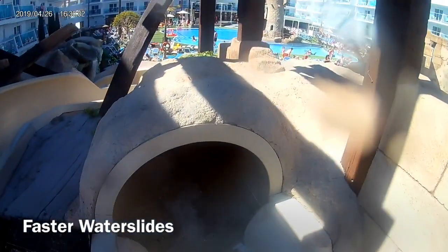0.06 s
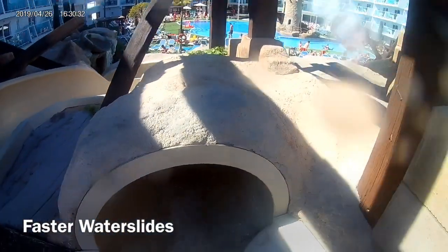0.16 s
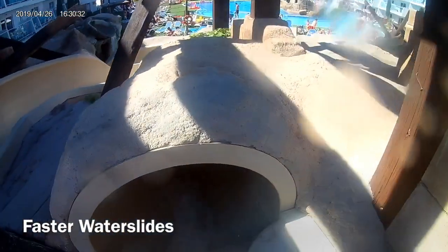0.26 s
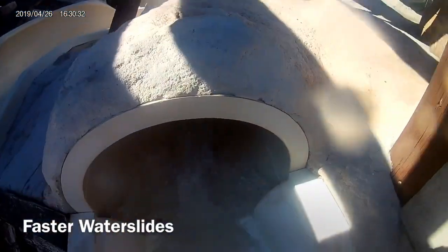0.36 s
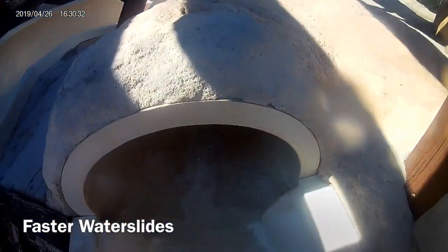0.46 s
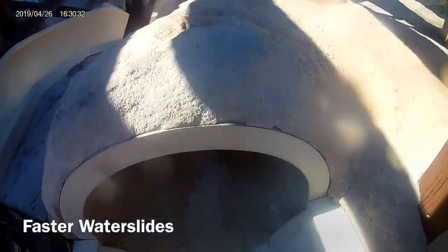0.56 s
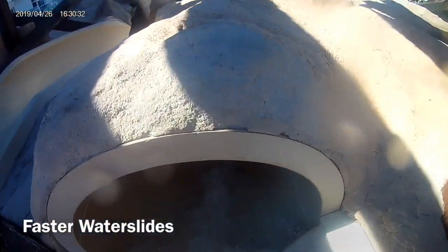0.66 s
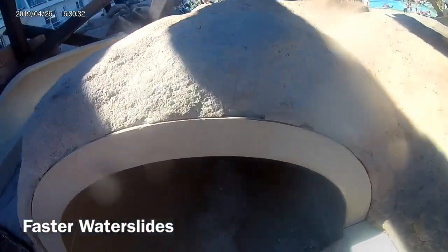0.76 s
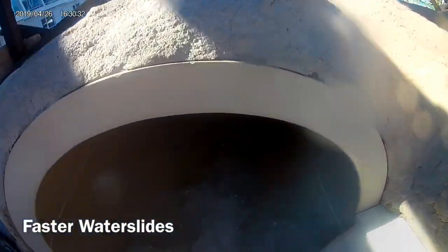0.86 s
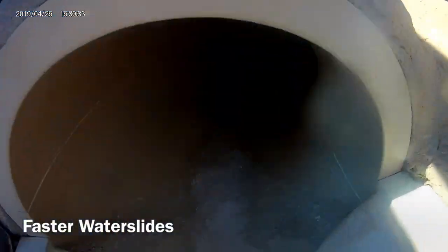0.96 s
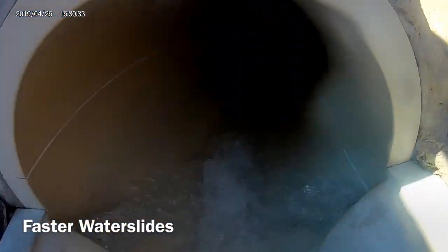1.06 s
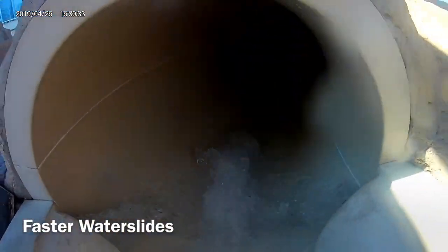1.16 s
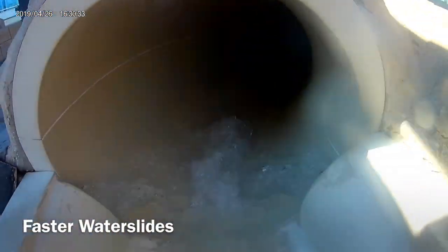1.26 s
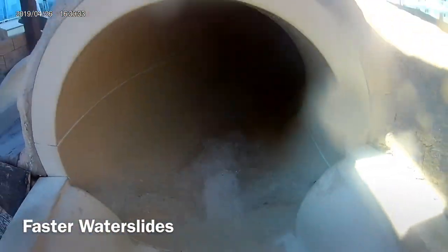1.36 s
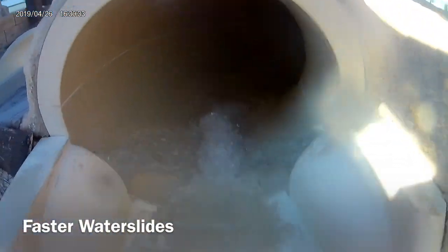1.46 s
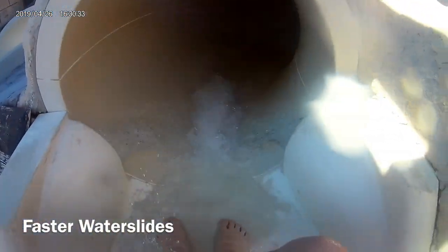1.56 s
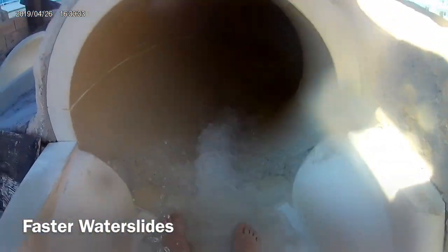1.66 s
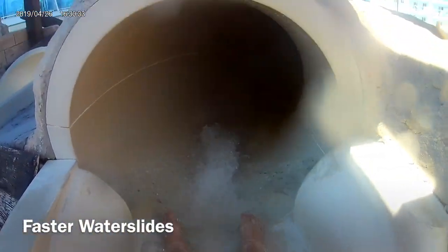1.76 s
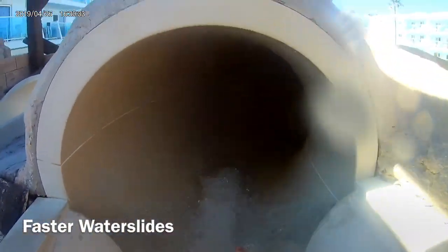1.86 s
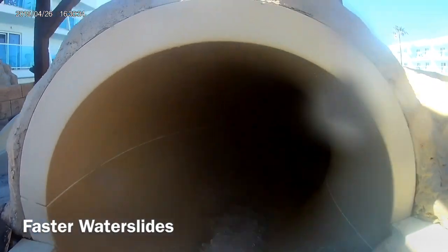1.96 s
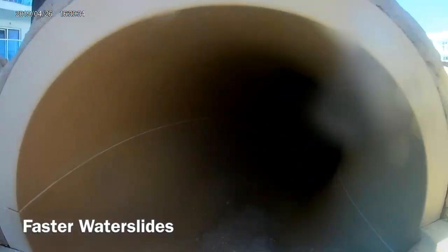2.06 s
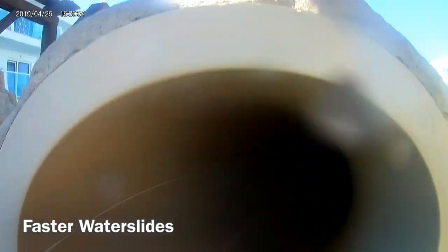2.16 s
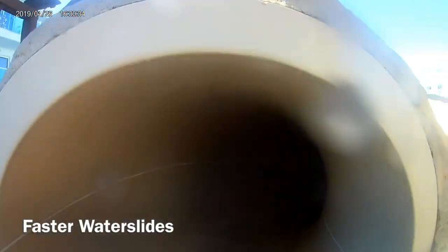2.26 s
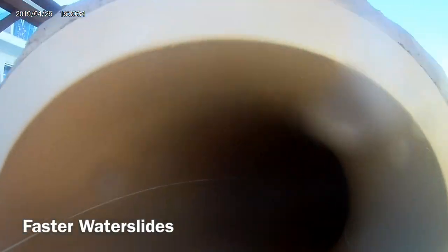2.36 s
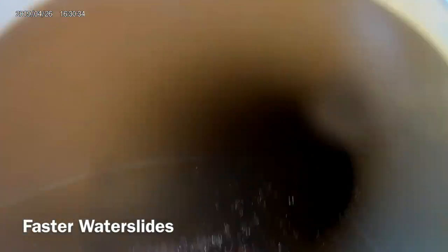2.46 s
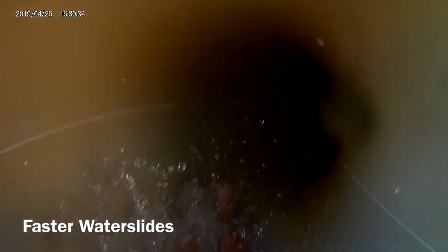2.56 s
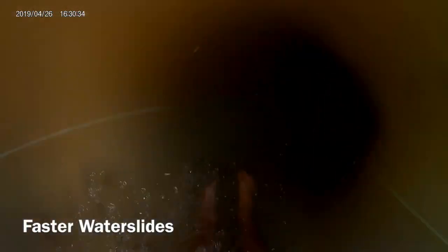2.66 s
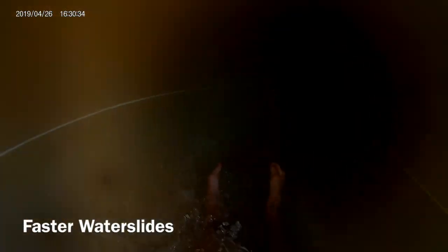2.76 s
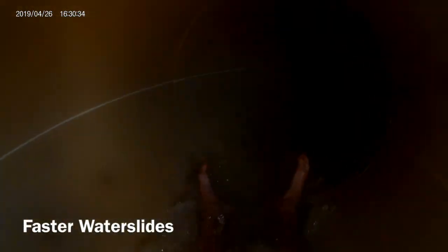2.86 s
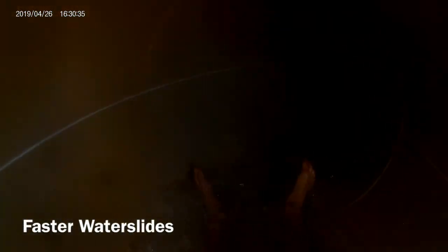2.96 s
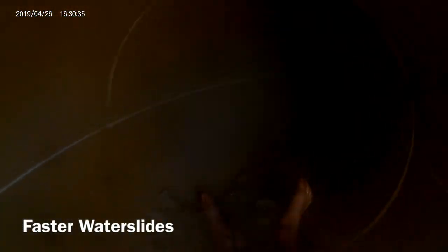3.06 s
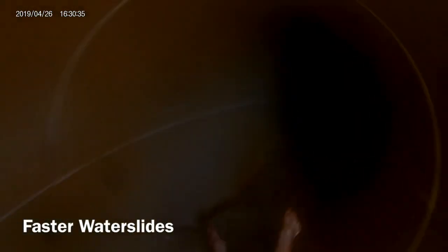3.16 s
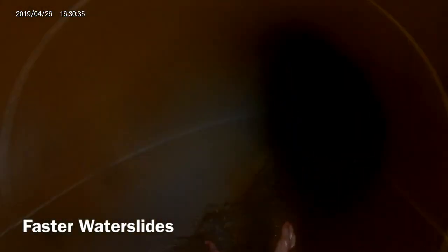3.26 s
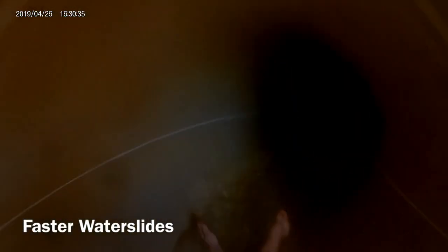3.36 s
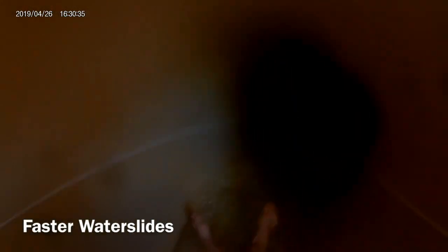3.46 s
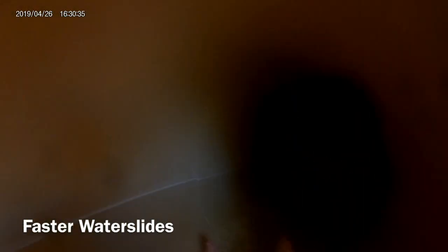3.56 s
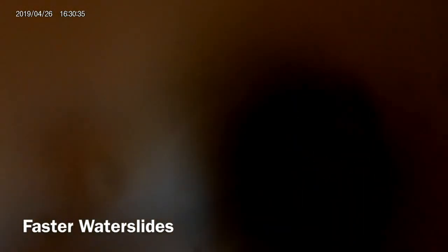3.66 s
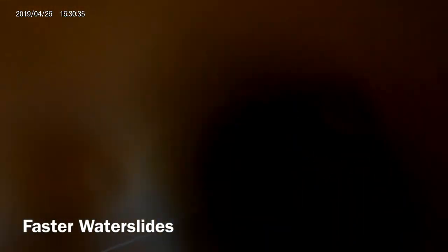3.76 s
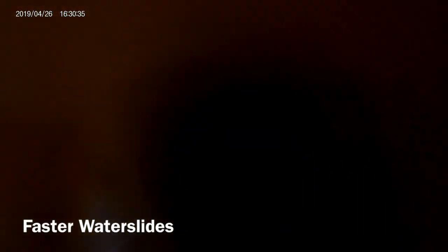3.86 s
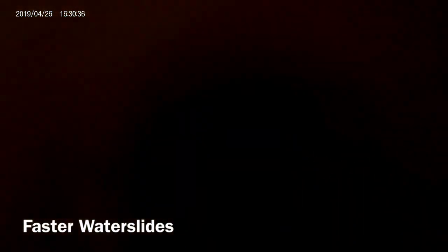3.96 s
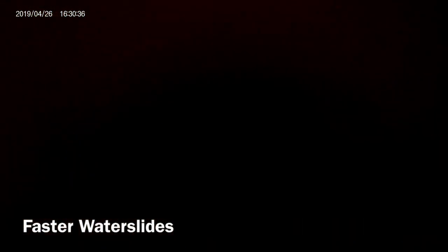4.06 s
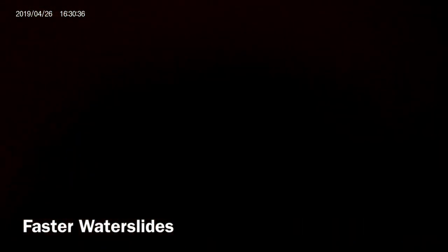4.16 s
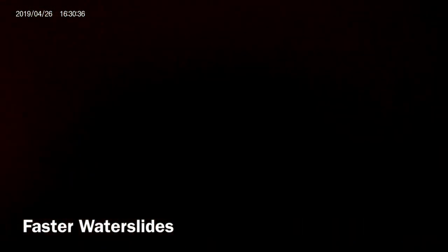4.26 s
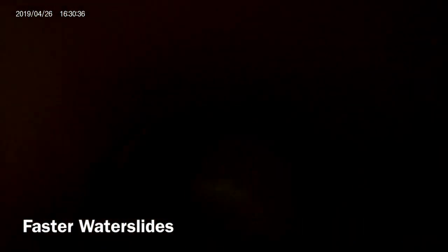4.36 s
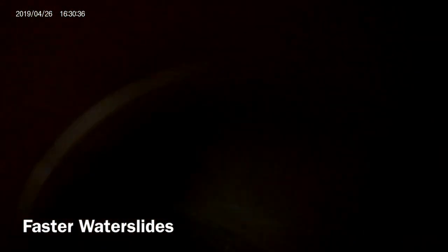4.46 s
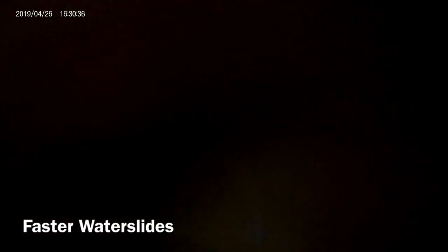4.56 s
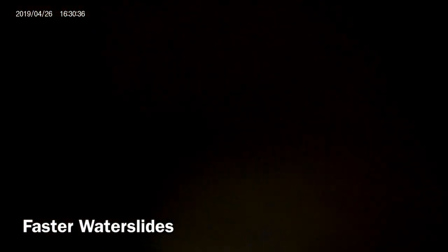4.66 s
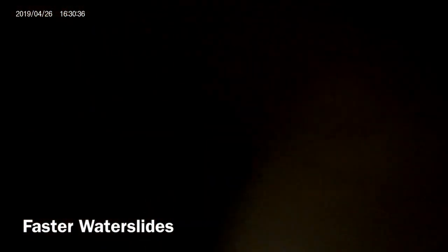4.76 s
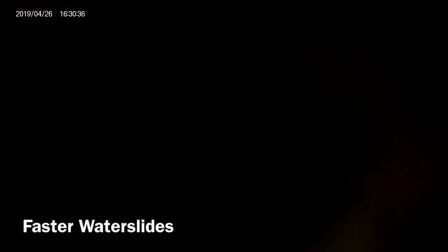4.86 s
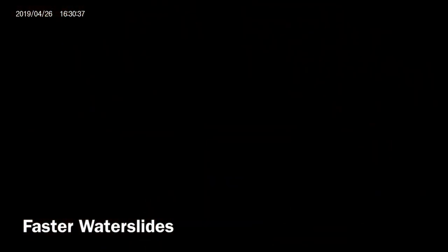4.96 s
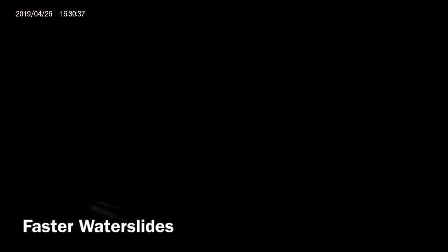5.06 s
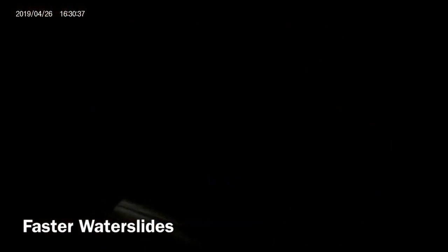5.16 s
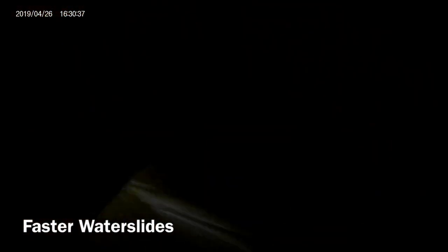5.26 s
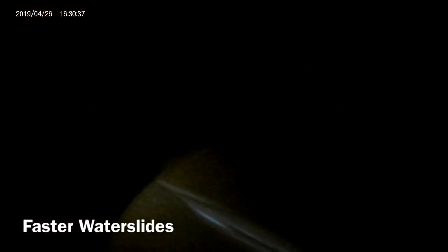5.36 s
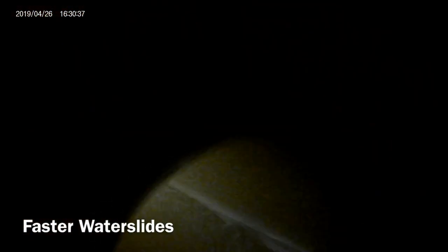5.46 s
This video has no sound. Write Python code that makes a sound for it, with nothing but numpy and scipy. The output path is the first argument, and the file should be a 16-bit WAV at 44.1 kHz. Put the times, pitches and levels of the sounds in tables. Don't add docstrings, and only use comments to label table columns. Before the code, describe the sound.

Close, muffled sound from a microphone shut inside a plastic housing: churning water with a nasal ring, a hollow tube boom and thin, watery treble. Low sways and drips come first, then sharp double knocks as the rider drops in. Inside the dark tube the rush is fuller, with ticks, thuds, short hollow gulps and a second hard clatter, then mostly steady water.

```python
import sys
import numpy as np
from scipy import signal
from scipy.fft import rfft, irfft, next_fast_len
from scipy.io import wavfile
from scipy.ndimage import uniform_filter1d, minimum_filter1d

SR = 44100
rng = np.random.default_rng(int(sys.argv[2]) if len(sys.argv) > 2 else 0)


def int16_out(signal):
    q = np.round(np.clip(np.atleast_2d(signal).T, -1, 1) * 32767)
    wavfile.write(sys.argv[1], SR, q.astype(np.int16))


def elevation(decibels):
    levels = np.asarray(decibels, float)
    return 10 ** (levels / 20)


N = 242991
T = np.arange(N) / SR

# pitch in Hz, width in Hz, level in dB.
CASE_RINGS = [(1360, 118.5, 7), (1262, 146, -4), (1596, 188, -4)]
# pitch in Hz, width in Hz.
UPPER_RING = (2090, 230)
# time in seconds, level in dB.
WATER_FLOW = [(0, -42.5), (.08, -40), (.9, -39), (1.3, -35), (1.7, -35.5), (2.05, -37), (2.6, -35.5),
              (2.75, -28), (2.95, -31.5), (3.2, -34), (3.55, -31.5), (3.75, -34.5), (3.85, -32),
              (4.5, -32.5), (4.8, -33.5), (5.15, -34.5), (5.51, -35.5)]
# time in seconds, level in dB.
RIDER_ROCKING = [(0, -54.5), (.2, -52), (.8, -53), (1.0, -49), (1.3, -49), (1.47, -44.5), (1.62, -51),
                 (2.05, -50.5), (2.27, -40), (2.47, -44.5), (2.7, -32.5), (2.9, -51.5), (3.25, -40.5),
                 (3.4, -46.5), (3.7, -36), (3.95, -42.5), (4.4, -35.5), (5.0, -43)]


def evened(x):
    return x / np.sqrt(np.mean(x ** 2) + 1e-20)


def add(mix, s, sound):
    part = mix[round(s * SR):][:len(sound)]
    part += sound[:len(part)]


def column(rows, index):
    table = np.array(rows)
    return np.interp(T, table[:, 0], table[:, index])


def coloured(x, points):
    hz, db = np.transpose(points)
    size = next_fast_len(N)
    log_hz = np.log(np.fft.rfftfreq(size, 1 / SR) + 1)
    shape_db = np.interp(log_hz, np.log(hz + 1), db)
    return evened(irfft(rfft(x, size) * elevation(shape_db), size)[:N])


def ring(x, hz, width):
    r = np.exp(-np.pi * width / SR)
    return 2 * signal.lfilter([1 - r], [1, -r * np.exp(2j * np.pi * hz / SR)], x).real


def layer_db(level_db, flow, rocking, soaked_db, fast_db):
    soak_s = 2.26
    soaked = np.clip((T - soak_s) / 0.3, 0, 1)
    fast = np.clip((T - soak_s) / 2.76, 0, 1)
    more_flow_db = column(WATER_FLOW, index=1) + 35
    more_rocking_db = column(RIDER_ROCKING, index=1) + 44
    from_ride_db = flow * more_flow_db + rocking * more_rocking_db
    return level_db + from_ride_db + soaked_db * soaked + fast_db * fast


def hiss(dull):
    # frequency in Hz, level in dB per Hz.
    hiss_colour = [(5000, -36), (6400, 1), (7000, 5), (7500, -1), (7950, -7.5), (8600, -0.5), (9600, -4.5),
                   (10600, -1), (11400, -6), (15700, -7), (16500, -62.5)]
    sharp = dull - uniform_filter1d(dull, size=700)
    peak_db = 5 * np.log10(abs(uniform_filter1d(sharp ** 4, size=1100)) + 1e-14)
    slow_db = uniform_filter1d(peak_db, size=13000)
    jumps = np.sqrt(0.76 + 0.28 * elevation(2.2 * (peak_db - slow_db)))
    return elevation(0.78 * slow_db - 50.5) * jumps * coloured(rng.standard_normal(N), hiss_colour)


def sway():
    # frequency in Hz, level in dB per Hz.
    sway_colour = [(7.1, -30), (12, 14), (30, 4.5), (42, 0), (64, -14), (123, -22), (172, -28.5),
                   (220, -40), (290, -62.5), (480, -120)]
    sway_db = column(RIDER_ROCKING, index=1) + 5.5
    return elevation(sway_db) * coloured(rng.standard_normal(N), sway_colour)


def gulps():
    # time in seconds, level in dB, pitch in Hz, width in Hz, length in seconds.
    gulp_rows = [
        (3.56, -42.5, 412, 140, 0.091),
        (3.627, -36, 374, 120, .09),
        (3.812, -39.5, 492, 162, 0.06),
        (4.162, -33, 564, 201, 0.11),
        (4.201, -41, 706, 242, 0.05),
        (4.39, -35.5, 530, 240, 0.032),
    ]
    noise = rng.standard_normal(N)
    out = np.zeros(N)
    for s, db, hz, width, length in gulp_rows:
        hollow = evened(ring(ring(noise, hz, width), hz, width))
        swell = np.exp(-((T - s) / (0.5 * length)) ** 2)
        out += elevation(db) * hollow * swell
    return out


def drops():
    # time in seconds, peak in dB, pitch in Hz.
    drop_rows = [(0.5922, -29, 1290), (0.722, -28, 1360), (1.476, -38, 1360), (1.6052, -22.5, 1420),
                 (1.6916, -23, 1360), (1.795, -25, 1340), (2.212, -24.5, 1390), (2.3363, -22, 1460),
                 (2.4533, -25.5, 1436), (3.035, -20, 1310), (4.5, -19, 1240)]
    t = T[:1200]
    u = t / 0.002
    swell = u * np.exp(1 - u)
    out = np.zeros(N)
    for s, db, hz in drop_rows:
        tone = np.sin(2 * np.pi * (hz * t + rng.random()))
        add(out, s, elevation(db) * swell * tone)
    return out


def ticks():
    # time in seconds, peak in dB.
    tick_rows = [
        (1.5854, -33),
        (2.1724, -21),
        (2.3345, -41),
        (2.5597, -24),
        (2.7421, -44),
        (3.231, -38),
        (3.6202, -52),
        (3.6752, -28),
        (3.7514, -44),
        (4.284, -37),
    ]
    # pitch in Hz, level in dB, time to fall by 60 dB in seconds.
    shell_notes = [(900, 0, .005), (1350, 5, .007), (2000, 5, .006), (3300, 1, .006), (4200, -2, .008),
                   (5000, -5, .005), (5700, -9, .006)]
    t = T[:1500]
    shell = np.zeros(len(t))
    for k, (hz, db, t60) in enumerate(shell_notes):
        shell += (-1) ** k * elevation(db - 60 * t / t60) * np.sin(2 * np.pi * hz * t)
    shell = signal.sosfilt(signal.butter(12, 6150, fs=SR, output="sos"), shell)
    grit_fade = np.exp(-T[:400] / 0.0018)
    out = np.zeros(N)
    for s, db in tick_rows:
        contact = 0.12 * rng.standard_normal(400)
        contact[0] = 1
        tick = np.convolve(contact * grit_fade, shell)
        add(out, s, elevation(db + 8.5) * tick / abs(tick).max())
    return out


def bumps():
    # time in seconds, direction, peak in dB, width in ms.
    bump_rows = [(0.235, 0.87, -32.5, 12), (1.095, 1, -35.5, 4.2), (1.4116, -0.45, -25.5, 2.8),
                 (2.19, 0.84, -21.5, 2.7), (2.2654, 0.88, -19, 5.3), (2.368, 1, -22, 12),
                 (2.5613, 0.94, -23, 0.87), (2.748, 0.9, -24, 8.2), (3.241, 0.75, -26, 9.2),
                 (3.285, 0.89, -31, 5.3), (3.6537, 1, -29, 3.1), (3.7133, -0.24, -16.5, 4.5),
                 (3.78, 1, -26.5, 6.4), (4.1624, 0.74, -19, 5.1), (4.31, 0.43, -21, 17),
                 (4.8325, 1, -34, 1.3), (4.9905, 0.98, -27, 3.7), (5.4, 0.9, -27, 8.8)]
    out = np.zeros(N)
    for s, direction, db, ms in bump_rows:
        u = np.arange(-3 * ms * SR // 1000, 30 * ms * SR // 1000) / (ms * SR / 1000)
        push = np.exp(-u ** 2)
        late = np.maximum(u, 0) / 0.92
        back = late * np.exp(-late) * np.cos(0.25 * late)
        balanced = push - back * push.sum() / back.sum()
        add(out, s - 3 * ms / 1000, direction * elevation(db) * balanced)
    return out


def rattle():
    # time in seconds, direction, peak in dB, width in ms, gap to the first bounce in ms (0 = none).
    strikes = [
        (2.343, 1, -8, .2, 0),
        (2.3772, -1, -8.5, .27, 5.8),
        (2.6087, -1, -8.5, .3, 6.9),
        (4.2836, 1, -8, .2, 0),
        (4.3163, -1, -5.5, .2, 6.2),
    ]
    before = 200
    t_ms = (np.arange(1200) - before) * 1000 / SR
    late = np.maximum(t_ms, 0) / 1.8
    spring_back = late * np.exp(1 - late)
    out = np.zeros(N)
    for s, direction, db, ms, gap_ms in strikes:
        near_corner = 1 / np.cosh(t_ms / ms) ** 2
        far_corner = 0.4 / np.cosh((t_ms - 0.55) / ms) ** 2
        blow = direction * (near_corner + far_corner - (0.4 + 0.07 * direction) * spring_back)
        while db > -18:
            add(out, s - before / SR, elevation(db - 2.3) * blow)
            if gap_ms == 0:
                break
            s += gap_ms / 1000
            db -= 3.6
            gap_ms *= 0.56
    main = elevation(-5) * ring(out, CASE_RINGS[0][0], 350)
    upper = elevation(-4) * ring(out, UPPER_RING[0], 500)
    bright = elevation(8) * ring(ring(out, 4250, 300), 4250, 900)
    return out + main + upper + bright


def churn(patchy_db, flicker_db, splash, per_s, spread_db):
    frames = N // 128 + 5
    a, b, patches = rng.standard_normal((frames, 257, 3)).T
    patches = uniform_filter1d(patches, size=5, axis=0)
    patches = evened(uniform_filter1d(patches, size=20, axis=1))
    flicker = evened(uniform_filter1d(rng.standard_normal(frames), size=12))
    z = (a + 1j * b) * elevation(patchy_db * patches + flicker_db * flicker)
    wash = evened(signal.istft(z, nperseg=512, noverlap=384)[1][:N])
    starts = rng.random(N) < per_s / SR
    sizes = elevation(spread_db * np.minimum(rng.exponential(1, N), 4)) * starts
    fade = elevation(-60 * T[:600] / 0.0098)
    splashes = signal.oaconvolve(sizes, fade)[:N] * rng.standard_normal(N)
    return wash + splash * evened(splashes)


def case_rush(flow, slosh):
    main = np.zeros(N)
    for hz, width, db in CASE_RINGS:
        main += elevation(db) * ring(ring(flow, hz, 2.15 * width), hz, 2.15 * width)
    upper = evened(ring(ring(slosh, *UPPER_RING), *UPPER_RING))
    upper_db = layer_db(-48, flow=0.63, rocking=0.07, soaked_db=3.5, fast_db=1.5)
    return elevation(column(WATER_FLOW, index=1)) * evened(main) + elevation(upper_db) * upper


def tube_boom(flow, slosh):
    # frequency in Hz, level in dB per Hz.
    mouth_colour = [(100, -26.5), (170, -11), (241, -28), (262, -5.5), (337, -12.5), (373, -3.5),
                    (421, 1.5), (549, -0.5), (717, 4.5), (804, 0), (1050, 3.5), (1360, -24), (2310, -120)]
    # frequency in Hz, level in dB per Hz.
    inside_colour = [(100, -28.5), (170, -17), (215, -10), (264, 7), (303, -1), (335, 2), (393, 2.5),
                     (479, 2), (712, 4.5), (835, 2), (1050, 6), (1360, -57), (2310, -120)]
    inside = np.clip((T - 1.9) / 0.51, 0, 1)
    tube = inside * coloured(slosh, inside_colour) + (1 - inside) * coloured(slosh, mouth_colour)
    hum = elevation(-12.5) * evened(ring(flow, hz=331.5, width=17))
    boom_db = layer_db(-44.5, flow=0.5, rocking=0.28, soaked_db=1, fast_db=1.5)
    return elevation(boom_db) * (tube + hum)


def spray(flow):
    # frequency in Hz, level in dB per Hz.
    spray_colour = [(1500, -7), (2400, 3.5), (2900, -5.5), (3400, -0.5), (4100, -4.5), (4500, -7.5),
                    (5800, -15.5), (6200, -15.5), (6600, -37), (9000, -74.5)]
    spray_db = layer_db(-48, flow=0.665, rocking=-0.03, soaked_db=3.5, fast_db=-0.5)
    return elevation(spray_db) * coloured(flow, spray_colour)


def water():
    flow = churn(patchy_db=1.5, flicker_db=0.3, splash=0.25, per_s=150, spread_db=2.0)
    slosh = churn(patchy_db=1.0, flicker_db=1.0, splash=0.38, per_s=30, spread_db=3.5)
    return case_rush(flow, slosh) + tube_boom(flow, slosh) + spray(flow)


def scene():
    return (sway() + gulps() + drops() + ticks() + bumps() + rattle() + water())[None]


def gated(x):
    # frequency in Hz, threshold in dB over the local level.
    gate_points = [(2500, -22), (3800, -13), (4700, -5), (5500, -2.5), (6200, 0), (6650, 5), (7000, 1),
                   (7850, 5), (8300, 1.3), (16000, 1.3)]
    hz, t, z = signal.stft(x, SR, "cosine", nperseg=2048)
    power = uniform_filter1d(abs(z) ** 2, size=3, axis=0)
    usual = uniform_filter1d(np.median(power, axis=1), size=9)
    power /= usual[:, None] + 1e-30
    local = minimum_filter1d(uniform_filter1d(power, size=60, axis=0), size=3, axis=1)
    chance = evened(uniform_filter1d(rng.standard_normal((len(t), 65)), size=2, axis=0))
    bands = np.repeat(chance.T, 16, axis=0)[:len(hz)]
    waver_db = np.where(hz < 7000, 3.8, 1.5)[:, None] * bands
    threshold_db = np.interp(hz, *np.transpose(gate_points))[:, None]
    limit = elevation(2 * (threshold_db + waver_db))
    kept = z * (power > limit * local)
    return signal.istft(kept, SR, "cosine", nperseg=2048)[1][:N]


def band_limit(x):
    return signal.sosfilt(signal.butter(12, 15720, fs=SR, output="sos"), x)


def record(dry):
    wall = signal.butter(10, 6900, fs=SR, output="sos")
    dull = signal.sosfilt(wall, dry[0])
    mix = gated(dull + hiss(dull))[None]
    return band_limit(mix)


dry = scene()
out = record(dry)
int16_out(out)
```